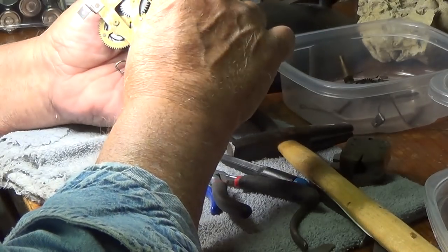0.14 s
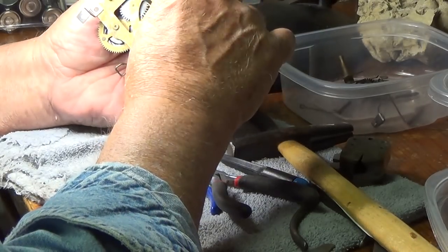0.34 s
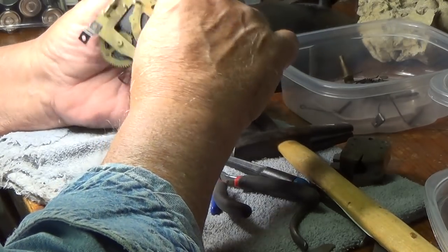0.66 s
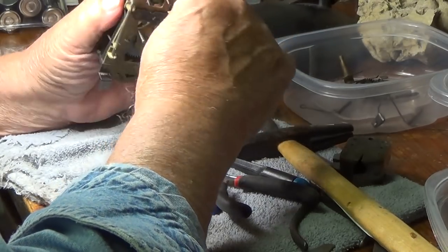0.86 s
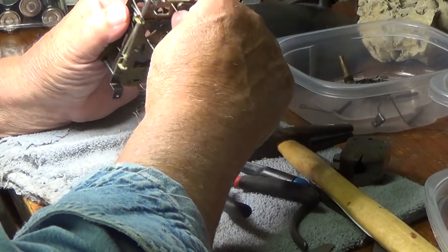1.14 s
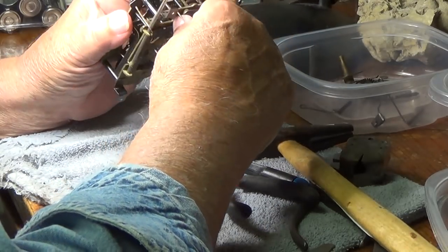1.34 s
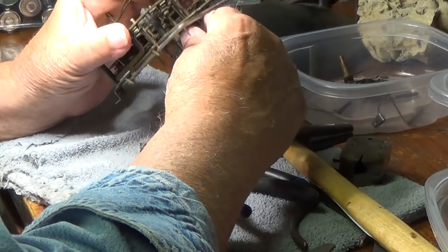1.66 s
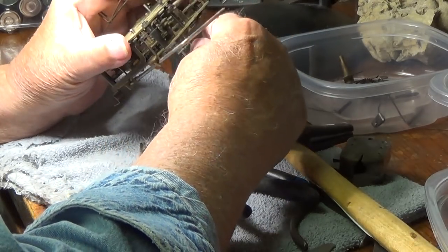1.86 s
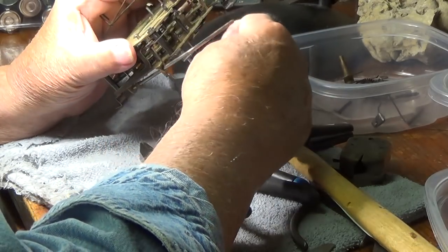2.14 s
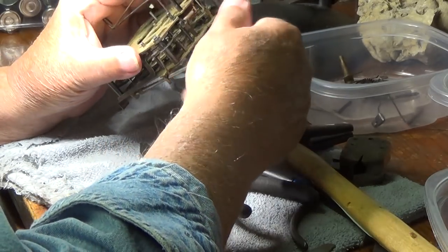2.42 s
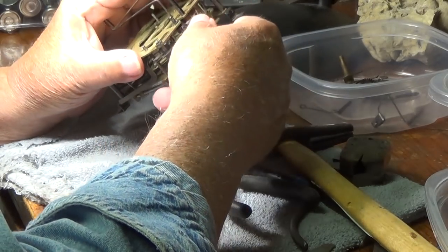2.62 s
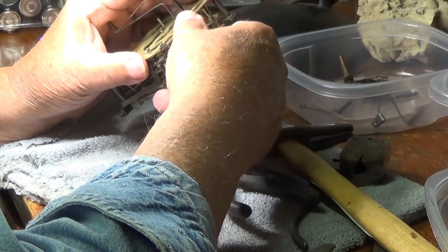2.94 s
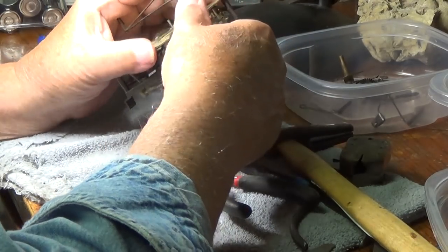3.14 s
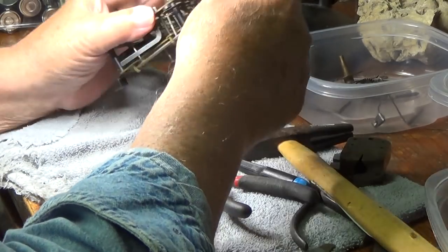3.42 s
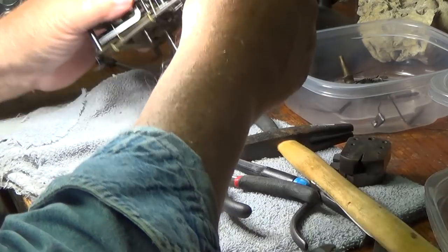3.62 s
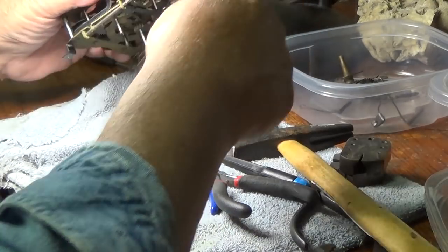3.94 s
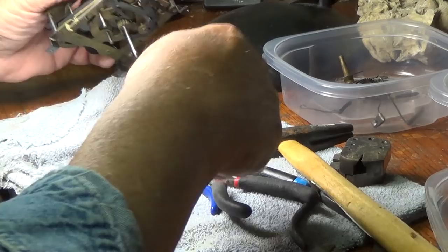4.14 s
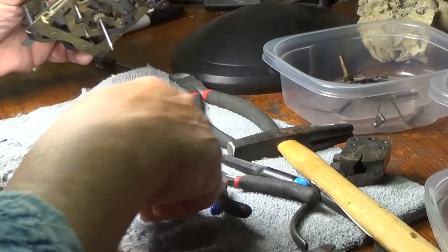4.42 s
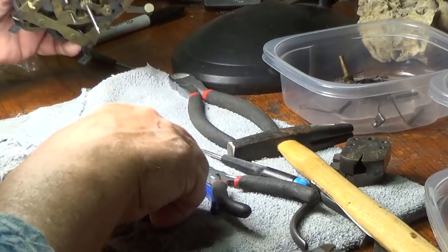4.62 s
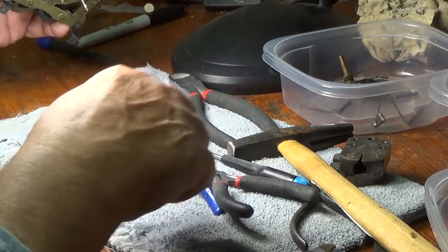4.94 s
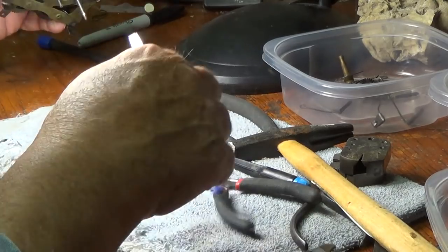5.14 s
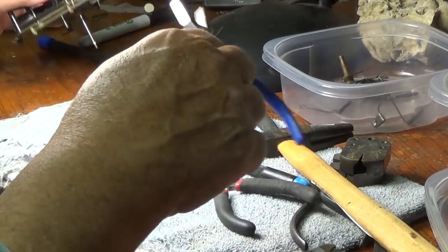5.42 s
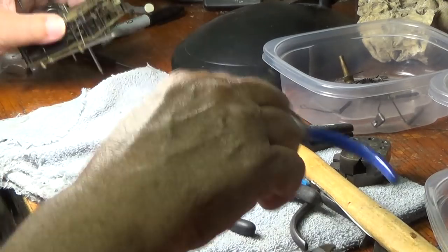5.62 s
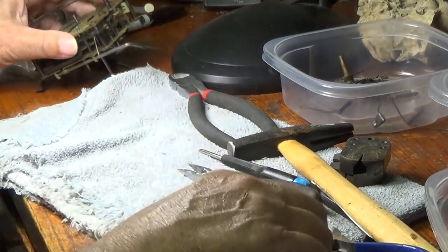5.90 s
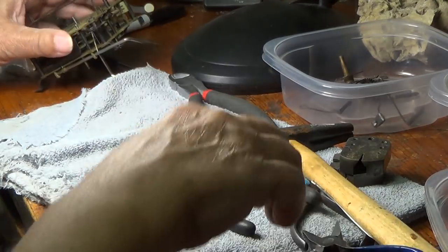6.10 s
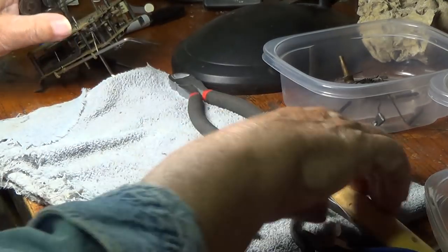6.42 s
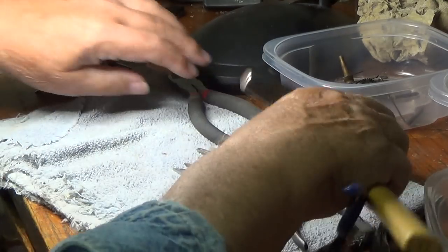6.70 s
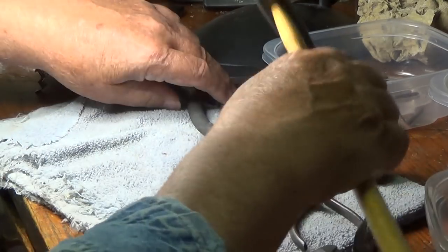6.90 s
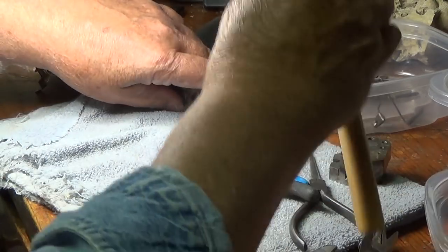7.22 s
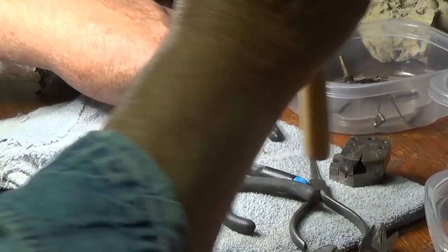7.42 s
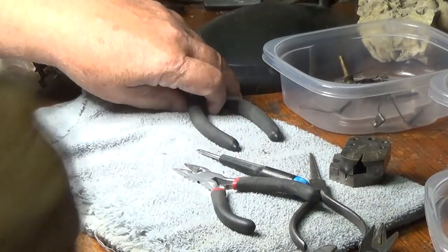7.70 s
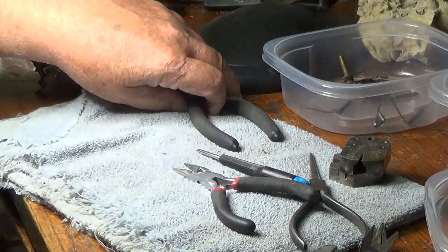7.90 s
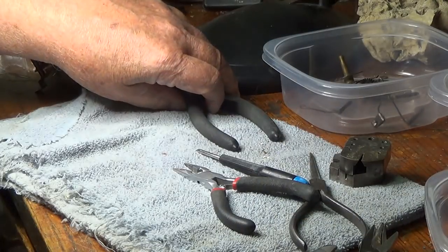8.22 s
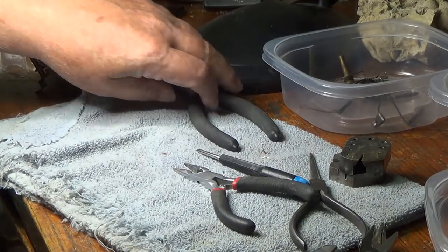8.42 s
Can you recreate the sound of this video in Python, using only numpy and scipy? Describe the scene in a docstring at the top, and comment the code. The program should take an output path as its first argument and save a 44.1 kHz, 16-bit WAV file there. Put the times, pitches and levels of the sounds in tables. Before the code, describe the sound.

Over quiet room hum and distant ticking, tiny metal parts click, a hammer and pliers clatter on the bench, pause, then clatter loudly again.

```python
"""Knocks of a brass clock movement, pliers and a small hammer on a wooden workbench: each is a cracking noise
burst shaped around its clack pitch, over decaying bench modes. Steel tools clink and scrape as snaps with modal
ringing, and parts of the movement click in the turning hand. Clocks tick further off; a sleeve brushes a towel and
the hand rubs dully. Contacts get a short workshop tail; room air, a faint fan and mains hum are steady beds."""
import sys
import numpy as np
from scipy import signal
from scipy.fft import rfft, irfft
from scipy.io import wavfile
from scipy.ndimage import uniform_filter1d

SR = 44100
rng = np.random.default_rng(int(sys.argv[2]) if len(sys.argv) > 2 else 0)


def bounce(signal):
    """Save signal as a 16-bit WAV file at the path given by the first command-line argument."""
    frames = np.transpose(np.atleast_2d(signal))
    limited = np.clip(frames, -1, 1)
    pcm = np.round(limited * 32767).astype(np.int16)
    wavfile.write(sys.argv[1], SR, pcm)


N = 377055
TIME = np.arange(N) / SR
# time since contact, for every short sound [s]
AGE = np.arange(int(0.4 * SR)) / SR


def undb(db):
    """Level definition: an amplitude ratio is ten to the power of decibels over twenty."""
    return 10 ** (np.asarray(db) / 20)


def unit(x):
    """Power normalization: scale to an rms of one."""
    return x / np.sqrt(np.mean(x ** 2))


def peak(x, db):
    """Short-time power: scale so that the loudest 3 ms have this rms level."""
    return x * undb(db) / np.sqrt(uniform_filter1d(x ** 2, size=132).max())


def fade(t60):
    """Exponential damping: the amplitude falls by 60 dB in t60 seconds."""
    return np.exp(-np.log(1000) * AGE / t60)


def band(x, lo_hz, hi_hz, order=2):
    """Resonant colour: a causal Butterworth band-pass keeps one range of frequencies."""
    sos = signal.butter(order, [lo_hz, hi_hz], "band", fs=SR, output="sos")
    return signal.sosfilt(sos, x)


def crack(t60):
    """Broadband impact: micro-impacts die away quickly and excite all frequencies about evenly."""
    spectrum = rfft(rng.standard_normal(len(AGE)) * fade(t60))
    even = spectrum / np.sqrt(uniform_filter1d(np.abs(spectrum) ** 2, size=80) + 1e-12)
    return irfft(even, len(AGE)) * fade(4 * t60)


def ring(modes, scatter_db):
    """Modal superposition: damped sinusoids sum, weighted anew by every point of contact."""
    hz, db, t60 = np.transpose(modes)[:, :, None]
    sign = rng.choice([-1, 1], hz.shape)
    gain = sign * undb(db + scatter_db * rng.standard_normal(hz.shape))
    partials = gain * np.sin(2 * np.pi * hz * AGE) * np.exp(-np.log(1000) * AGE / t60)
    return np.sum(partials, axis=0)


def in_room(x, wet_db, gap_s=0.0013):
    """Reverberation: dense reflections, new for every contact, decay at a rate set by frequency."""
    # decay of the workshop: frequency_hz, t60_s
    decay = [(150, 0.4), (700, 0.19), (2000, 0.16), (5000, 0.15), (12000, .17)]
    hz, t60 = np.transpose(decay)
    freq = np.fft.rfftfreq(len(AGE), 1 / SR)
    noise = rfft(rng.standard_normal(len(AGE)))
    tail = np.zeros(len(AGE))
    # overlapping bands share the noise, each with its own decay
    for share, band_t60 in zip(np.eye(len(hz)), t60):
        weight = np.interp(np.log1p(freq), np.log(hz), share)
        tail += irfft(noise * weight, len(AGE)) * fade(band_t60)
    # reflections build up over the first moment
    tail *= np.minimum(AGE / gap_s, 1)
    wet = signal.fftconvolve(x, tail / np.linalg.norm(tail))[:len(x)]
    return x + undb(wet_db) * wet


def add(track, s, x):
    """Linear superposition: mix a sound into the track at s seconds."""
    i = int(np.clip(s * SR, 0, N - 1))
    track[i:i + len(x)] += x[:N - i]


def air():
    """Stationary noise: spectrally shaped room air, plus a narrow band for a faint fan resonance."""
    # spectrum of the room noise, densities relative to each other: frequency_hz, density_db
    spectrum = [(15, -56), (25, -34), (48, -8.5), (70, -5.5), (87, -21), (107, -3.5), (147, -8.5),
                (197, -6.5), (271, -6.5), (363, -6.5), (448, -10.5), (892, -12), (1100, -11.5), (3180, -17),
                (14000, -24)]
    hz, db = np.transpose(spectrum)
    freq = np.fft.rfftfreq(N, 1 / SR)
    # no room noise above 14.2 kHz
    gain = undb(np.interp(np.log1p(freq), np.log(hz), db)) * (freq < 14200)
    room = unit(irfft(rfft(rng.standard_normal(N)) * gain, N))
    fan = unit(band(rng.standard_normal(N), 857.46, 919))
    return room * undb(-57.5) + fan * undb(-72)


def hum():
    """Harmonic mains hum: steady sinusoids, each wavering a little in phase."""
    # mains components: frequency_hz, rms_db
    components = [(59.7, -71.5), (119.8, -68.5), (180, -77.5), (240, -74), (300, -80), (360, -68.5)]
    # ten random phase offsets a second, joined by straight lines
    knots = np.arange(0, TIME[-1] + 1, 1 / 10)
    out = np.zeros(N)
    for hz, db in components:
        waver = 0.25 * np.interp(TIME, knots, rng.standard_normal(len(knots)))
        phase = 2 * np.pi * (hz * TIME + rng.random()) + waver
        # root two turns an rms level into a sine amplitude
        out += np.sqrt(2) * undb(db) * np.sin(phase)
    return out


def sleeve():
    """Friction noise: cloth sliding over cloth gives a fine, grainy hiss."""
    # strength of a sleeve brushing the towel: time_s, level_db
    strokes = [(0, -69), (5.5, -65.5), (5.68, -67), (5.9, -57), (6.3, -64), (6.6, -57.5), (7.2, -59),
               (7.45, -59.5), (7.66, -55.5), (7.9, -59), (8.1, -60.5), (8.55, -52.5)]
    fibres = rng.standard_normal(N) * rng.exponential(size=N)
    return unit(band(fibres, 480, 5100, order=1)) * undb(np.interp(TIME, *np.transpose(strokes)))


def parts():
    """Impact on a plate: levers and wheels click against brass, whose modes ring on."""
    # small parts clicking in the hand: start_s, level_db, pitch_hz
    clicks = [(0.098,-36.5,9300), (0.425,-53,12000), (.84,-50,7140), (1.142,-41,7960), (1.2245,-38.5,11900),
              (1.522,-49.5,9300), (1.595,-53,11000), (1.702,-45,3170), (1.934,-47,2760), (1.963,-51,9000),
              (3.972,-34.5,10500)]
    # modes of the brass movement: frequency_hz, level_db, t60_s
    brass = [(7320, -30, 0.061), (8900, -4, 0.23), (9350, -15, 0.084), (11360, 4, 0.091), (13200, -15, .07)]
    out = np.zeros(N)
    for s, db, hz in clicks:
        click = peak(in_room(band(crack(0.02), hz * 0.55, hz * 1.37), wet_db=-3.5), 0)
        plate = peak(ring(brass, scatter_db=2), -6)
        add(out, s, peak(click + band(plate, hz * 0.37, hz * 1.05), db))
    return out


def hollow_tock():
    """Two-band impact: a low and a higher resonance make a hollow tock once a second, dying away."""
    first_s, start_db, fade_db_per_s = 0.174, -48.5, 1.3
    out = np.zeros(N)
    for s in np.arange(first_s, N / SR):
        hollow = peak(band(crack(0.064), 700, 910), 0)
        hollow += peak(band(crack(0.063), 2100, 3600), -1.5)
        add(out, s, peak(in_room(hollow, wet_db=4), start_db - fade_db_per_s * s))
    return out


def pendulum_clock():
    """Periodic escapement: a pallet strikes the escape wheel, which rings briefly, slightly out of beat."""
    # tick and tock of the clock across the room: first_s, level_db, pitch_hz
    beats = [(.269, -48, 4530), (0.7298, -45.5, 4050)]
    # modes of the escapement: frequency_hz, level_db, t60_s
    escapement = [(3250, -1, 0.044), (3920, 3, 0.031), (4480, 5.5, 0.047), (5300, -22, 0.023)]
    swing_s, beat_scatter_db = 0.9755, 2
    out = np.zeros(N)
    for first_s, db, hz in beats:
        for s in np.arange(first_s, N / SR, swing_s):
            pallet = peak(band(crack(0.023), hz * 0.59, hz * 1.42), 0)
            pallet += peak(ring(escapement, scatter_db=4), -0.5)
            beat_db = db + beat_scatter_db * rng.standard_normal()
            add(out, s, peak(in_room(pallet, wet_db=2.5), beat_db))
            # a faint bright tick follows each beat
            bright = in_room(band(crack(0.056), 10400, 12600), wet_db=7)
            add(out, s + 0.016, peak(bright, -57))
    return out


def second_clock():
    """Granular friction: a second clock advances once a second with a soft, grainy scrape."""
    out = np.zeros(N)
    for s in np.arange(0.612, N / SR):
        grains = crack(0.28) * (1 - fade(0.082)) * rng.exponential(size=len(AGE))
        add(out, s, peak(in_room(band(grains, 2900, 6200), wet_db=-6.5), -51))
    return out


def handling():
    """Narrow-band friction: the turning movement rubs dully against the palm."""
    # dull rubs: start_s, pitch_hz, level_db
    rubs = [(1.17, 203, -60), (1.9, 254, -56), (2.139, 200.6, -59.5), (3.33, 268, -62), (4.42, 202, -57.5)]
    out = np.zeros(N)
    for s, hz, db in rubs:
        rub = rng.standard_normal(len(AGE)) * fade(0.38) * (1 - fade(0.32))
        add(out, s, peak(band(rub, hz * 0.96, hz * 1.03), db))
    return out


def knocks():
    """Impact excitation: a hard edge cracks, the object clacks, and bench modes thud under it."""
    # things knocking on the bench: start_s, clack_db, clack_hz, thud_db, treble_crack_db, contact_t60_s
    contacts = [(4.166,-29.5,1620,-43.5,-53,0.019), (5.759,-28.5,1401,-33.5,-39.5,0.028),
                (5.765,-35.5,400,-28,-40,0.077), (5.875,-28.5,2010,-42.5,-44,0.02),
                (6,-39.5,1476,-38,-45,0.057), (6.021,-34.5,600,-28.5,-41,0.16),
                (6.029,-33,350,-29.5,-37,0.089), (6.0675,-14.5,850,-19.5,-31.5,0.026),
                (6.259,-51,1106,-45.5,-55,0.036), (6.638,-19,1660,-25.5,-41,0.024),
                (6.648,-23,1300,-44,-38,0.038), (6.662,-25.5,1770,-40,-32,.038),
                (6.7262,-27,1370,-31.5,-36,0.017), (6.738,-34,1500,-31,-27,.054),
                (6.7566,-19,1190,-25.5,-31,0.011), (6.779,-24.5,1200,-29.5,-29,.018),
                (6.8145,-19,2110,-27,-35,0.019), (6.8503,-25.5,1270,-29.5,-34,0.033),
                (6.918,-26.5,1580,-29.5,-32,0.023), (6.965,-35,820,-28.5,-34,0.016),
                (6.995,-21,790,-23.5,-30,.016), (7.0291,-22,1180,-37,-35,0.016),
                (7.125,-37,790,-35.5,-39,0.032), (8.1814,-13.5,1180,-16.5,-25,0.032),
                (8.192,-19.5,1240,-18,-21,0.12), (8.246,-30,1580,-40,-34,0.014),
                (8.3461,-23,1510,-24.5,-42,0.022), (8.351,-16.5,760,-17,-32,0.024),
                (8.422,-31.5,1360,-22.5,-47,.012), (8.451,-32.5,1370,-28,-44,.022),
                (8.4944,-18,1580,-21.5,-19.5,0.079), (8.511,-19,1320,-19.5,-21,.036),
                (8.5376,-13.5,1200,-15.5,-21.5,0.045)]
    # modes of the bench top: frequency_hz, level_db, t60_s
    bench = [(117, -16, 0.19), (175, -24, 0.1), (208.3, 1, 0.15), (240.6, -2.5, 0.27), (276.5, -5, 0.12),
             (340, -9.5, 0.12), (371, -2.5, 0.14), (441.7, 1.5, 0.18), (496, 3.5, 0.1), (553, 1, 0.13),
             (601, 0, 0.16), (701, 4.5, 0.08), (829, 1, 0.14), (910, 2, 0.086), (1060, -8, 0.29),
             (1119, -3, 0.085), (1223, -3.5, 0.14), (1427, -11, 0.12), (1510, -24, 0.12),
             (1830, -11.5, 0.07), (2194, 3.5, 0.054), (2400, -19, 0.088), (2650, -20, .1), (3005, -15, 0.2),
             (3400, -15, 0.32)]
    # the hands move things in a few goes, each at its own place on the bench:
    # from_s, thud_hz (under a clack of reference_hz), clack_width_octaves
    moves = [(0, 480, 1.1), (5.5, 353, 1.5), (6.5, 443, 1.8), (8, 317, 1.6)]
    # a harder, higher clack also wakes higher bench modes: exponent of the pitch ratio
    reference_hz, thud_follow = 1300, 0.54
    out = np.zeros(N)
    for s, db, hz, thud_db, crack_db, t60 in contacts:
        _, place_hz, octaves = [move for move in moves if move[0] <= s][-1]
        thud_hz = place_hz * (hz / reference_hz) ** thud_follow
        half = 2 ** (octaves / 2)
        # the contact takes a moment to reach full force
        press = 1 - fade(0.0068)
        wood = ring(bench, scatter_db=3.5)
        clack = peak(in_room(band(crack(t60) * press, hz / half, hz * half), wet_db=-2), 0)
        clack += peak(band(wood * (1 - fade(0.0086)), hz / half, hz * half), -6.5)
        # the thud pitch favours some bench modes over others
        thud = peak(band(wood, thud_hz * 0.58, thud_hz * 2.05), 0)
        thud += peak(in_room(band(crack(0.024), thud_hz * 0.61, thud_hz * 1.77), wet_db=-1.5), -2.7)
        weight = band(crack(0.071), 58, 200, order=3)
        low = peak(thud, 0) + peak(weight, -23.5)
        edge = in_room(band(crack(0.015) * press, 3400, 11500), wet_db=2)
        add(out, s, peak(clack, db) + peak(low, thud_db) + peak(edge, crack_db))
    return out


def steel_contact(tool, hz, t60):
    """Impact and modal response: steel gives a bright snap or scrape, then the tool rings on."""
    # modes of the hammer, pliers' jaws, pliers' joint and a small pin: frequency_hz, level_db, t60_s
    hammer = [(4100,-5,0.082), (5750,-17,0.12), (7140,-19,.07), (7400,-11,0.076), (8720,0,0.071),
              (9000,-12,0.077), (10270,-20,.05), (13080,-7,.06), (13600,-4,0.066)]
    jaws = [(3060,-8,0.13), (5730,-14,0.08), (7350,-4,0.074), (7850,-8,0.1), (7800,-1,0.068),
            (8620,-20,.08), (9421,-6,.07), (9570,-2,0.067)]
    joint = [(4930, -34, .1), (5750, -4, 0.064), (6400, 3, 0.1), (9200, -20, .08), (9600, 5, 0.027),
             (10900, 0, 0.037), (12400, 4, 0.058)]
    pin = [(2200, -12, .03), (3690, 0, 0.036), (5370, -6, 0.043), (10100, 2, .015)]
    # each with the level of its ringing against the snap [dB]
    tools = {"hammer": (hammer, -10), "jaws": (jaws, -6), "joint": (joint, -11), "pin": (pin, 2)}
    modes, ring_db = tools[tool]
    # the grip shifts the mode frequencies a little from one blow to the next
    grip = 1 + 0.01 * rng.standard_normal((len(modes), 1)) * np.array([1, 0, 0])
    steel = band(ring(modes * grip, scatter_db=4), hz * 0.45, hz * 1.4, order=1)
    # loose contact makes the ring chatter
    chatter = undb(4 * unit(uniform_filter1d(rng.standard_normal(len(AGE)), size=200)))
    ringing = in_room(steel * chatter, wet_db=-6)
    snap = in_room(band(crack(t60), hz * 0.76, hz * 1.23), wet_db=-16.5)
    return peak(snap, 0) + peak(ringing, ring_db)


def clinks():
    """Contact duration: tools strike each other briefly, or slide and stay in contact for longer."""
    # steel striking steel: start_s, level_db, snap_hz, what rings
    strikes = [(5.878,-28.5,11600,"joint"), (5.9392,-35.5,10600,"joint"), (5.9552,-39,7500,"joint"),
               (6.424,-42,4300,"pin"), (6.434,-39,4500,"pin"), (6.7381,-35,10000,"hammer"),
               (6.778,-17,10500,"joint"), (6.8529,-14,10000,"hammer"), (6.858,-23,9500,"hammer"),
               (6.8764,-15.5,9500,"hammer"), (6.9182,-21,10000,"hammer"), (6.925,-26,9050,"hammer"),
               (6.941,-28,7500,"hammer"), (6.965,-18.5,9250,"hammer"), (6.9986,-18.5,7560,"hammer"),
               (7.03,-25,12000,"hammer"), (7.046,-22.5,8140,"hammer"), (7.127,-31,9000,"hammer"),
               (8.1924,-11,8300,"jaws"), (8.198,-14,8100,"jaws"), (8.249,-28,8500,"jaws"),
               (8.495,-12,7500,"joint")]
    # steel sliding along the pliers' joint: start_s, level_db, snap_hz, t60_s
    scrapes = [(5.762,-33.5,11600,0.24), (6.0225,-34.5,11000,.26), (6.662,-27,10900,0.037),
               (8.501,-23.5,8000,.1)]
    out = np.zeros(N)
    for s, db, hz, tool in strikes:
        add(out, s, peak(steel_contact(tool, hz, t60=0.015), db))
    for s, db, hz, t60 in scrapes:
        add(out, s, peak(steel_contact("joint", hz, t60), db))
    return out


def scene():
    """Stereo superposition: a nearly central sum, with small level and opposite-phase differences."""
    clocks = hollow_tock() + pendulum_clock() + second_clock()
    mid = sleeve() + parts() + clocks + handling() + knocks() + clinks()
    # the side signal enters the two channels with opposite signs
    spread = crack(0.014)
    side = undb(-20) * signal.fftconvolve(mid, spread / np.linalg.norm(spread))[:N]
    bass = unit(band(rng.standard_normal(N), 24, 210))
    side += undb(-13.5) * air() + undb(-71.5) * bass
    # left minus right [dB]: leans left at first, slightly right in the middle, left again at the end
    pan_db = np.interp(TIME, [5.7, 6.1, 7.2, 8.1], [1.3, -0.3, -0.39, 0.69])
    sides = np.array([[1], [-1]])
    return mid * undb(sides * pan_db / 2) + (air() + hum()) * undb(sides * 0.5) + sides * side


def record(dry):
    """Saturation and band limit: the loudest peaks are rounded and the top is cut above 15.3 kHz."""
    rounded = 0.7 * np.tanh(dry / 0.7)
    low_pass = signal.ellip(8, 0.2, 70, 15300, fs=SR, output="sos")
    return signal.sosfilt(low_pass, rounded)


dry = scene()
out = record(dry)
bounce(out)
```